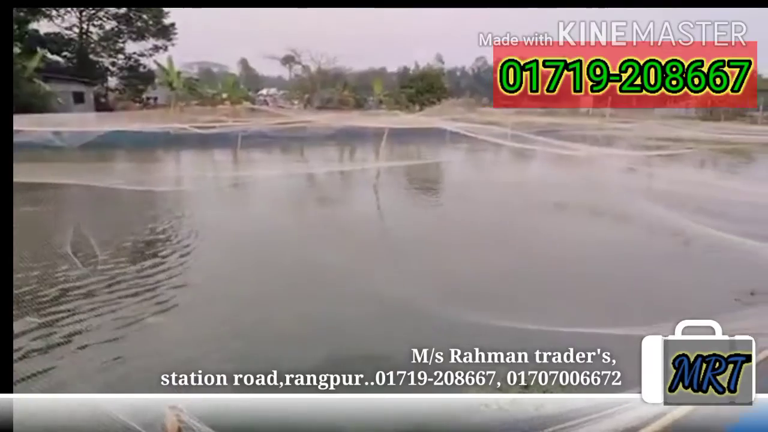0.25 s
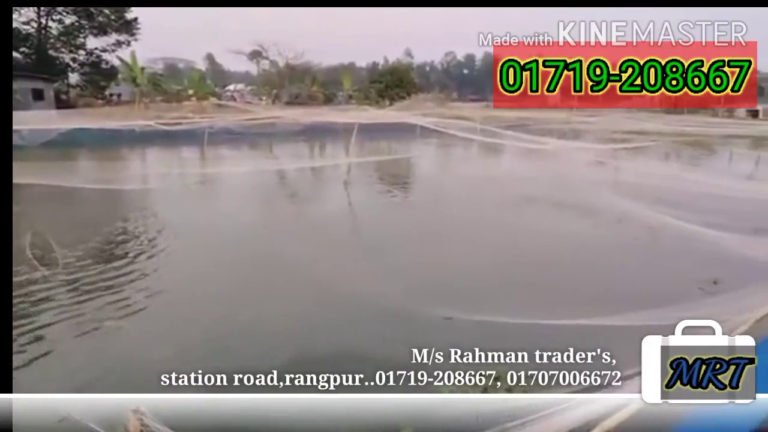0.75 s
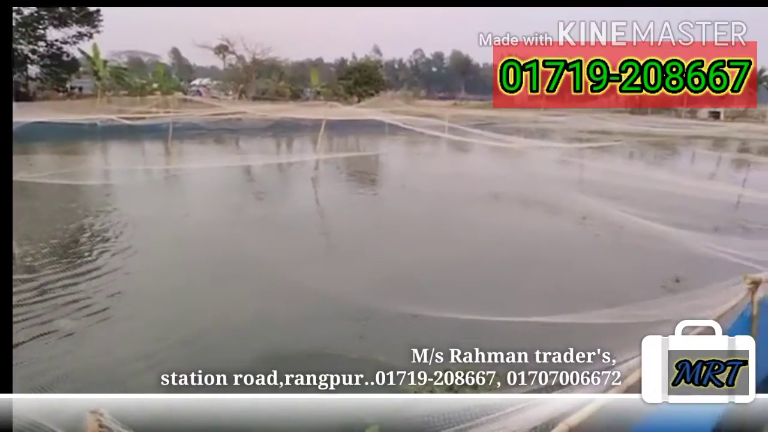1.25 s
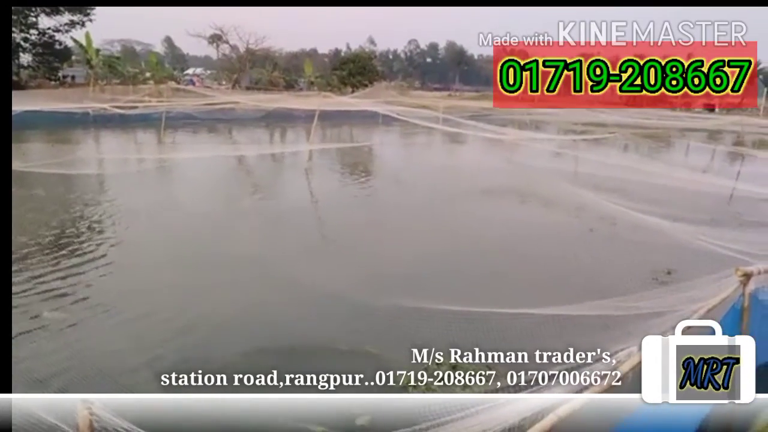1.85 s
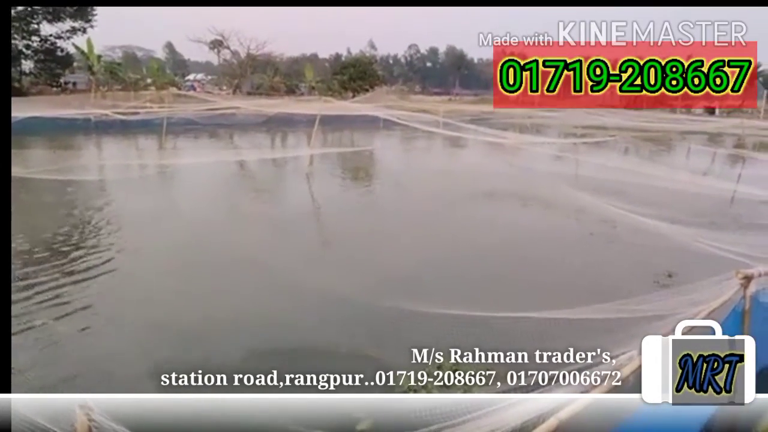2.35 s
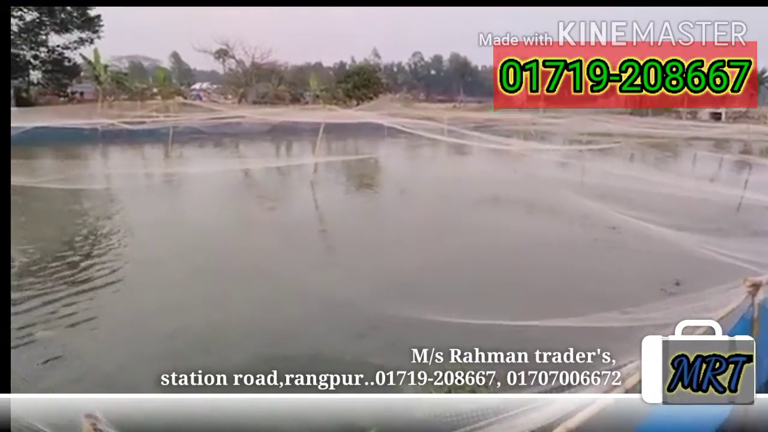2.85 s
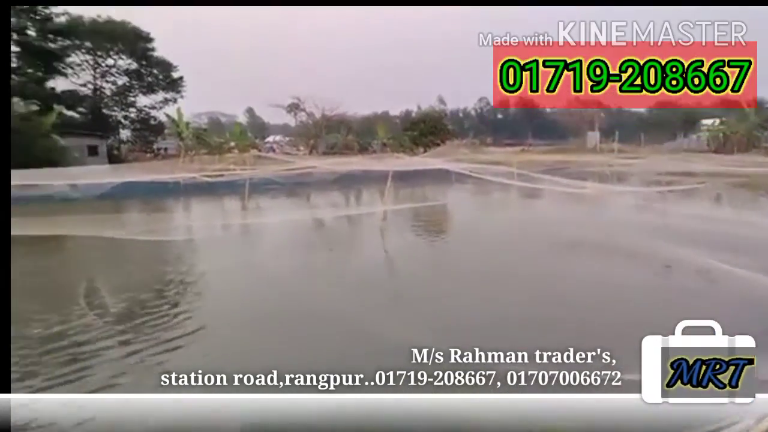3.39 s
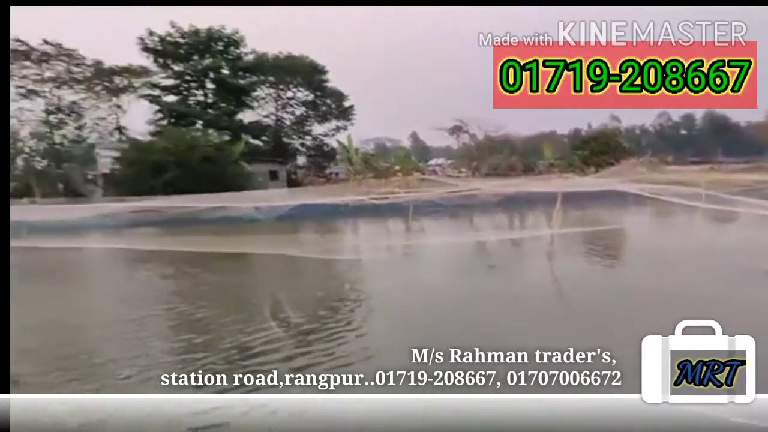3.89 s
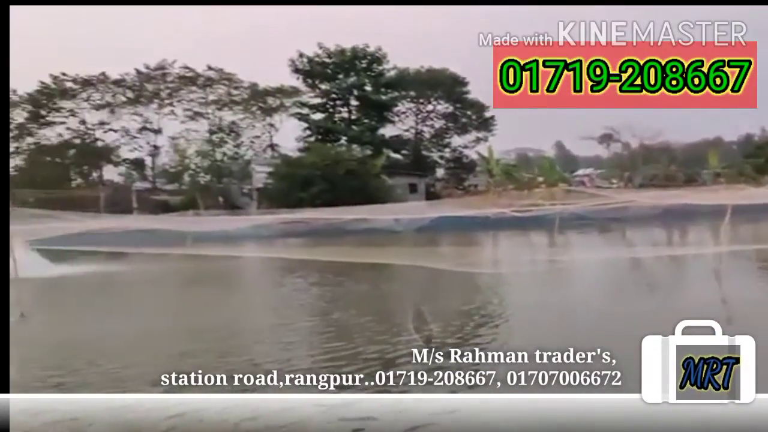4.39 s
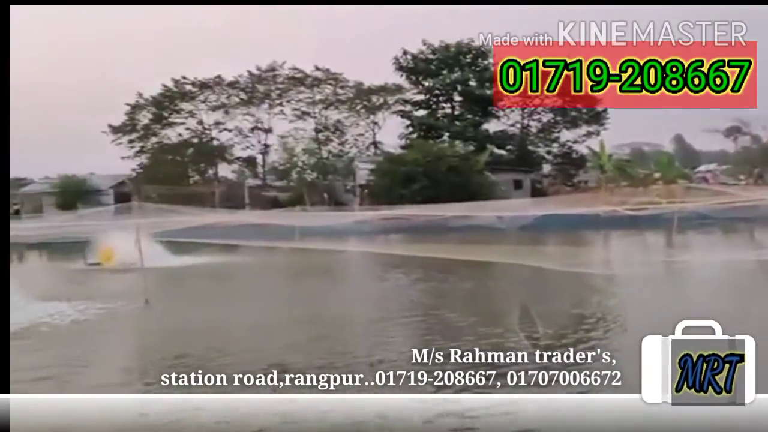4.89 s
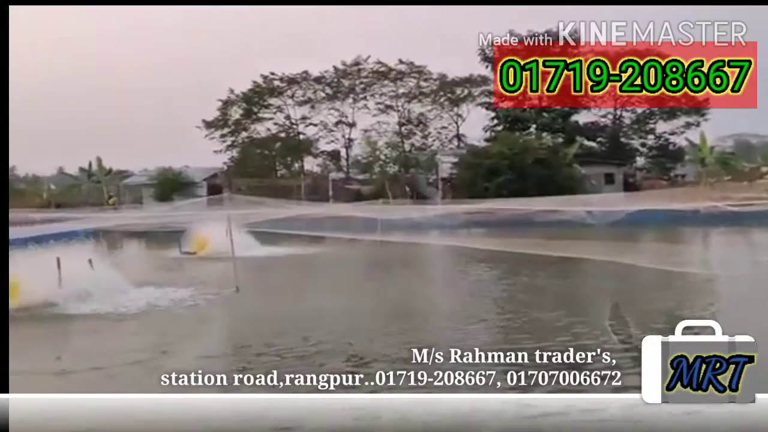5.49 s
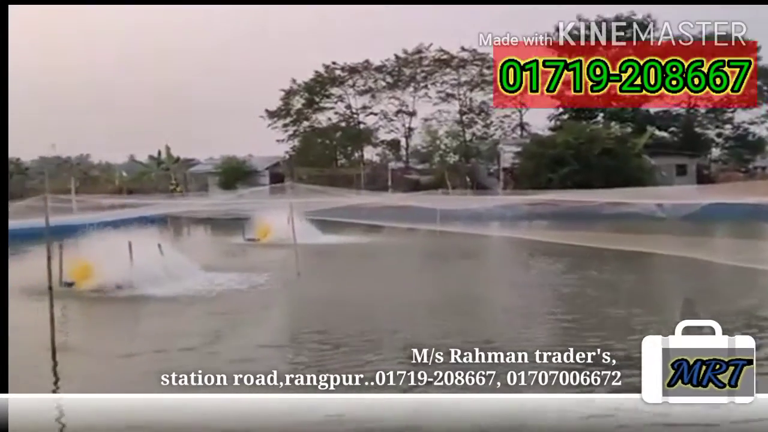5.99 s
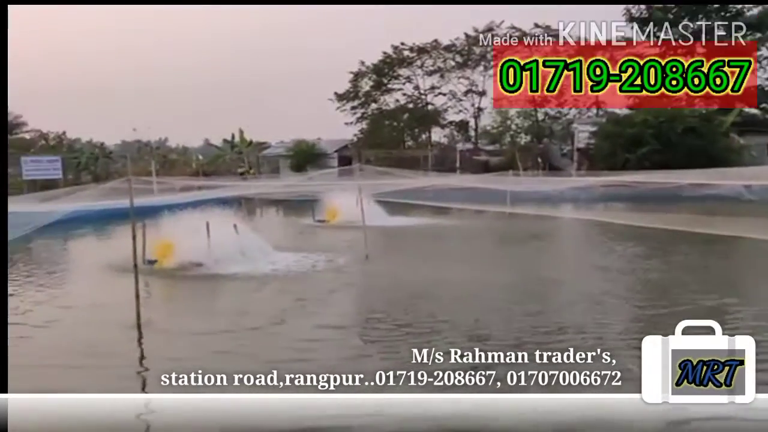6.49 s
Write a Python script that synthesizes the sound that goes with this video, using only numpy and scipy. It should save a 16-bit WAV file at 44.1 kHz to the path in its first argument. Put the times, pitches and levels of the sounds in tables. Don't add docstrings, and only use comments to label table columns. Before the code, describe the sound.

Continuous rushing splash and foamy hiss outdoors, with faint motor hum and gear whine beneath, and a few sharp drop slaps late on.

```python
import sys
import numpy as np
from scipy import signal
from scipy.fft import rfft, irfft
from scipy.io import wavfile
from scipy.ndimage import uniform_filter1d

SR = 44100
rng = np.random.default_rng(int(sys.argv[2]) if len(sys.argv) > 2 else 0)


def put_to_file(sound):
    columns = np.atleast_2d(sound).T
    safe = np.clip(columns, -1, 1)
    whole_steps = np.round(safe * 32767)
    wavfile.write(sys.argv[1], SR, whole_steps.astype(np.int16))


def nominal_scale(level):
    x = np.asarray(level, float) / 20
    return 10 ** x


N = 297234


def rms_one(x):
    return x / np.sqrt(np.mean(x ** 2, axis=-1, keepdims=True) + 1e-20)


def read_curve(rows, at):
    first, *columns = np.transpose(rows)
    return [np.interp(at, first, c) for c in columns]


def drift(rate_hz):
    hop = 40
    r = np.exp(-2 * np.pi * hop * rate_hz / SR)
    noise = rng.standard_normal(N // hop + 2002)
    slow = signal.lfilter([1], [1, -2 * r, r * r], noise)[2000:]
    return np.interp(np.arange(N) / hop, np.arange(len(slow)), rms_one(slow - slow.mean()))


# f/Hz, own flicker/dB, shared surge/dB, paddle beat/dB, drop share/0-1
SPLASH_BANDS = [(150, .3, .05, .05, .03), (500, .2, .02, .02, .02), (1400, 1.0, .02, .05, .05),
                (2800, .7, .05, .4, .04), (5600, .5, .05, .25, .04), (9000, .35, .15, .2, .03),
                (13000, 1.2, .5, .8, .04)]


def splash(drops_per_s, size_db):
    paddle_hz, wheel_hz = 14.0, 3.1
    t = np.arange(N) / SR
    hiss = rng.standard_normal((2, N))
    born = rng.random((2, N)) < drops_per_s / SR
    sign = rng.choice([-1, 1], (2, N))
    size = np.minimum(rng.exponential(1, (2, N)), 5)
    drops = rms_one(born * sign * nominal_scale(size_db * size))
    surge = rms_one(drift(7.2) + 2 * drift(7.8))
    beat = np.sin(2 * np.pi * paddle_hz * t + 0.5 * drift(0.32))
    beat = beat + 0.25 * np.sin(2 * np.pi * wheel_hz * t + 1.7 * drift(0.28))

    log_hz = np.log(np.fft.rfftfreq(N, 1 / SR) + 1)
    centres = np.log(np.array(SPLASH_BANDS)[:, 0])
    hiss, drops, out = rfft(hiss), rfft(drops), 0
    for k, (_, flicker_db, surge_db, beat_db, share) in enumerate(SPLASH_BANDS):
        share = np.clip(share, 0, 1)
        mask = np.interp(log_hz, centres, np.arange(len(SPLASH_BANDS)) == k)
        band = irfft(mask * (np.sqrt(1 - share) * hiss + np.sqrt(share) * drops), N)
        out = out + band * nominal_scale(flicker_db * drift(9.1) + surge_db * surge + beat_db * beat)
    return out


# t/s, heading (0 side-on, 1 half way, 2 facing)
TURN = [
    (0, .08),
    (3.3, .12),
    (3.9, 0.48),
    (4.5, 1.1),
    (5.5, 1.76),
    (6.74, 1.89),
]


def heading_at(t_s):
    return read_curve(TURN, t_s)[0]


# lag/ms, per pose
CHURN_LAG_MS = [
    .37,
    .25,
    .05,
]
# f/Hz, side-on, half way, facing
BAND_AGREE = [(1925, -0.76, -.5, -.68), (2703, 0.96, .72, 0.16), (3229, -0.76, -.05, -.45),
              (3790, -0.76, -.3, -0.045), (4280, 0.54, 0.043, 0.3), (6400, -0.65, .2, -0.16),
              (7310, 0.77, -0.46, -.4), (8500, -.1, -0.043, -.05)]


def agreement(hz, pose):
    banded_from_hz, banded_full_hz = 1250, 1686
    likeness, loss_per_khz = 0.997, 0.11
    lag_turns = np.minimum(hz * CHURN_LAG_MS[pose] / 1000, 0.5)
    wave = np.clip(likeness - loss_per_khz * hz / 1000, 0, 1) * np.exp(-2j * np.pi * lag_turns)
    banded = np.clip(read_curve(BAND_AGREE, hz)[pose], -1, 1)
    share = np.clip((hz - banded_from_hz) / (banded_full_hz - banded_from_hz), 0, 1)
    return ((1 - share) * wave + share * banded)[:, None]


# f/Hz, left level/dB per Hz, right level/dB per Hz
WATER_SIDE_ON = [(27, -57.5, -66), (60, -68, -71), (91.5, -63, -61), (176, -69, -70), (270, -62.5, -64),
                 (398, -64.5, -66), (523, -65.5, -64), (673, -66, -64.5), (810, -71.5, -70),
                 (1020, -69.5, -69.5), (1313, -66, -66.5), (1755, -64, -67), (1995, -66.5, -62.5),
                 (2000, -72, -65.5), (2520, -62.5, -64.5), (2890, -70.5, -65), (3430, -68.5, -67),
                 (4910, -64.5, -73.5), (5780, -56, -69.5), (7630, -85, -68), (9200, -78, -67.5),
                 (10940, -85, -75), (11900, -81.5, -75), (13695, -89, -75), (14300, -84, -74),
                 (14800, -81, -75), (15073, -83, -84)]
WATER_HALF_WAY = [(27, -79, -71), (75, -58, -69.5), (194, -69, -68.5), (280, -59, -60.5), (398, -65, -63),
                  (500, -69, -69), (710, -75, -67.5), (760, -67.5, -76.5), (906, -62, -63.5),
                  (1440, -79, -68.5), (2020, -70.5, -64), (2090, -62, -67.5),
                  (2153, -68.5, -69.5), (2660, -66.5, -68), (3250, -64.5, -70), (3620, -69.5, -72),
                  (4500, -64, -73.5), (6050, -53.5, -69.5), (7063, -70.5, -71.5), (7666, -76, -71),
                  (9000, -81, -65.5), (10422, -79.5, -71.5), (11800, -78, -77), (13400, -86, -78),
                  (14400, -83, -79), (15000, -84, -80)]
WATER_FACING = [(27, -72, -55), (75, -56, -85.5), (172, -77, -54.5), (280, -62.5, -66), (430, -65, -62),
                (500, -70, -73.5), (576, -77, -61), (600, -67.5, -71.5), (840, -63.5, -61),
                (1140, -65, -66), (1400, -74.5, -69.5), (2040, -58, -68.5),
                (2240, -68.5, -68), (2970, -60.5, -72.5), (3270, -66, -69), (4930, -63.5, -74),
                (4990, -58, -65), (6130, -50.5, -72), (6800, -66, -67), (7770, -72, -73), (8900, -78, -63),
                (11250, -76, -72), (12660, -75, -74.5), (13400, -88, -74.5), (14298, -79, -74),
                (15000, -84, -76)]


def ports(sound):
    equal_below_hz, unequal_above_hz = 200, 600
    frame = dict(fs=SR, nperseg=2048, noverlap=1536)
    hz, s, (shared, apart) = signal.stft(sound, **frame)
    heading = np.clip(heading_at(s), 0, 2)

    def colour_db(at, level_db):
        return np.interp(np.log(hz + 1), np.log(at), level_db)[:, None]

    poses = [WATER_SIDE_ON, WATER_HALF_WAY, WATER_FACING]
    left_db, right_db, alike = 0, 0, 0
    for k, colour in enumerate(poses):
        weight = np.clip(1 - abs(heading - k), 0, 1)
        at, left, right = np.array(sorted(colour)).T
        left_db = left_db + weight * colour_db(at, left)
        right_db = right_db + weight * colour_db(at, right)
        alike = alike + weight * agreement(hz, pose=k)
    evening = np.interp(hz, [equal_below_hz, unequal_above_hz], [1, 0])[:, None]
    evened = (left_db - right_db) / 2 * evening
    left_db, right_db = left_db - evened, right_db + evened
    right = alike * shared + np.sqrt(np.clip(1 - abs(alike) ** 2, 0, 1)) * apart
    both = np.array([nominal_scale(left_db) * shared, nominal_scale(right_db) * right])
    both = both * np.sqrt(SR / 2)
    return signal.istft(both, **frame)[1][:, :N]


def tone(hz, db, wander_rad):
    phase = 2 * np.pi * hz * np.arange(N) / SR + wander_rad * drift(1.0) + 7 * rng.random()
    return np.sqrt(2) * nominal_scale(db) * np.sin(phase)


# f/Hz, level/dB
MOTORS = [
    (100.38, -51),
    (99.16, -56),
    (98.71, -58),
]


def mains(facing):
    in_step_s = 2.99
    since = np.arange(N) / SR - in_step_s
    hums = sum(nominal_scale(db) * np.sin(2 * np.pi * hz * since) for hz, db in MOTORS)
    return np.sqrt(2) * nominal_scale(-3 + 6 * facing) * hums


# f/Hz, level/dB, wobble/dB
HUM = [(33, -55, 1.0), (51.8, -47, .8), (60.6, -60, 1.0), (65.9, -55, 1.0), (83, -56, 1.0),
       (200.5, -56, 2.1)]


def hum(facing):
    lines = sum(tone(hz, db + wobble_db * drift(1.5), wander_rad=0.62) for hz, db, wobble_db in HUM)
    return lines + mains(facing)


# multiple of shaft, side-on level/dB, facing level/dB
GEAR = [(11.03, -51, -43.5), (12.3, -53, -52.5), (13.05, -50, -50.5), (14.04, -58.5, -52),
        (15.16, -50, -61), (16.51, -58, -72), (17.36, -52, -70), (20.7, -58.5, -93), (21.76, -56.5, -67),
        (24, -57.5, -77), (26.23, -52, -56.5), (26.57, -52.5, -55.5), (39.43, -57, -55)]


def gear(facing):
    shaft_hz = 24.66
    return sum(tone(round(order) * shaft_hz, side_db + facing * (front_db - side_db) + 3.8 * drift(3.5),
                    wander_rad=0.98)
               for order, side_db, front_db in GEAR)


def motors():
    at = np.arange(N)
    facing = np.clip(heading_at(at / SR) / 2, 0, 1)
    both = hum(facing) + gear(facing)
    lag_samples = 17 - 15 * facing
    return np.array([both, np.interp(at - lag_samples, at, both)])


# t/s, peak level/dB
SLAPS = [
    (4.129, -25),
    (4.8336, -15.5),
    (5.279, -27),
    (5.5424, -25),
    (5.890, -25),
    (6.061, -27),
]


def slaps():
    s, db = np.transpose(SLAPS)
    out = np.full(N, 1e-18)
    out[(s * SR).astype(int)] = nominal_scale(db + 42)
    return signal.sosfilt(signal.butter(1, [3300, 7500], "band", fs=SR, output="sos"), out)


# f/Hz, threshold level/dB under the stronger
WEAK_PARTNER = [(1200, -9), (2000, -5.5), (3200, -4.5), (6000, -6), (7500, -4.6), (12000, -5.2)]


def joint_stereo(x):
    joint_from_hz, faint_db, under_band_db, scatter_db = 1200, -83.5, -3.5, 1.5
    pad = 1024 - 885
    window = signal.windows.kaiser_bessel_derived(2048, 4 * np.pi)
    frame = dict(fs=SR, window=window, nperseg=2048, noverlap=1024)
    hz, s, (left, right) = signal.stft(np.pad(x, ((0, 0), (pad, 0))), **frame)
    band = np.floor(np.log((hz + 1) / 3095) / np.log(1.105)).astype(int)
    for k in np.unique(band[hz > joint_from_hz]):
        rows = band == k
        mid, side = left[rows] + right[rows], left[rows] - right[rows]
        ratio = np.sqrt(np.sum(abs(mid) ** 2, 0) / np.sum(abs(side) ** 2 + 1e-20, 0))
        weak_db = read_curve(WEAK_PARTNER, hz[rows].mean())[0]
        weak = nominal_scale(weak_db + scatter_db * rng.standard_normal(len(s)))
        mid, side = mid * (ratio > weak), side * (ratio < 1 / weak)
        pair = np.array([mid + side, mid - side]) / 2
        power = uniform_filter1d(abs(pair) ** 2, size=4, axis=1)
        mean = power.mean(axis=1, keepdims=True)
        floor = np.maximum(mean * nominal_scale(2 * under_band_db), nominal_scale(2 * faint_db) * hz[1])
        floor = np.minimum(floor, mean * 1.5)
        scatter = nominal_scale(2 * scatter_db * rng.standard_normal(len(s)))
        left[rows], right[rows] = pair * (power > floor * scatter)
    return signal.istft(np.array([left, right]), **frame)[1][:, pad:pad + N]


def scene():
    water = splash(drops_per_s=2500, size_db=6.0)
    water[0] += slaps()
    return ports(water) + motors()


def low_pass(x):
    return signal.sosfilt(signal.butter(12, 15060, fs=SR, output="sos"), x)


def record(dry):
    dry = signal.sosfilt(signal.butter(2, 22, "high", fs=SR, output="sos"), dry)
    return low_pass(joint_stereo(dry))


dry = scene()
out = record(dry)
put_to_file(out)
```